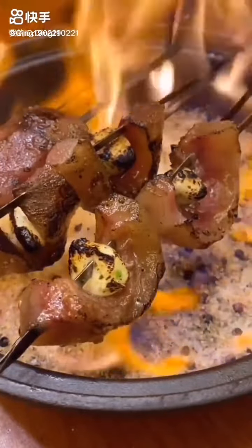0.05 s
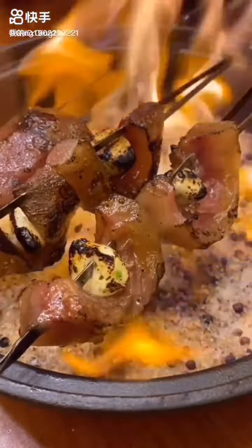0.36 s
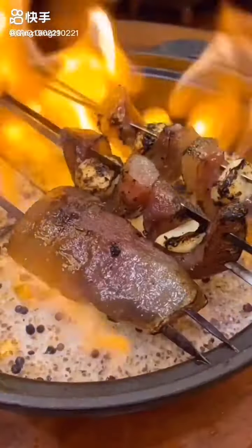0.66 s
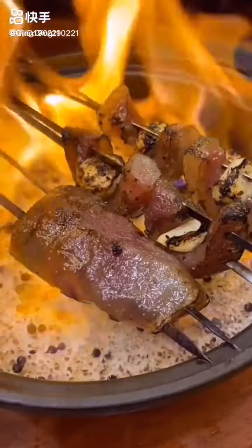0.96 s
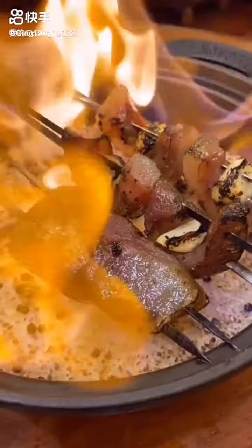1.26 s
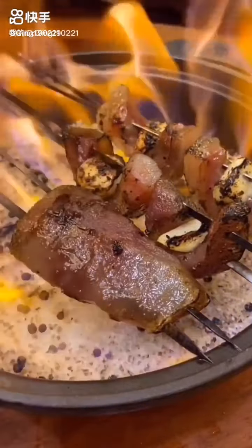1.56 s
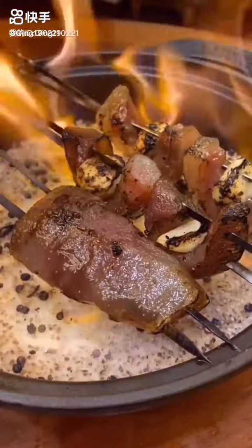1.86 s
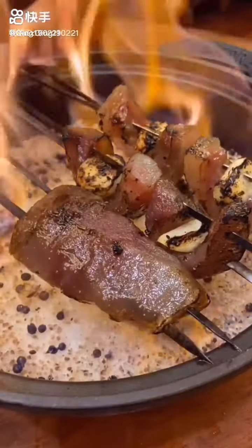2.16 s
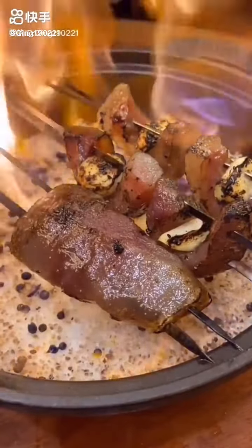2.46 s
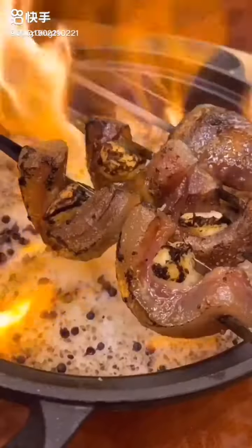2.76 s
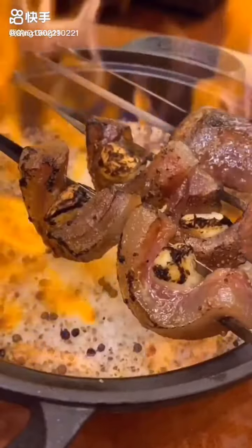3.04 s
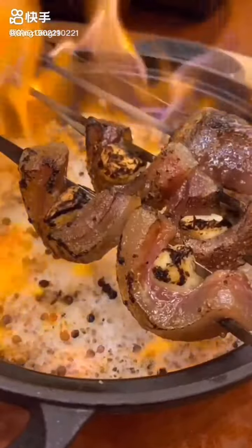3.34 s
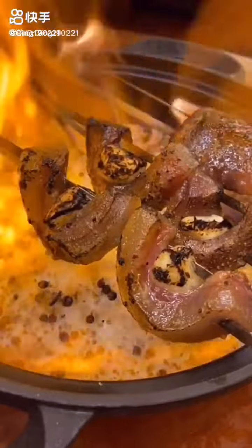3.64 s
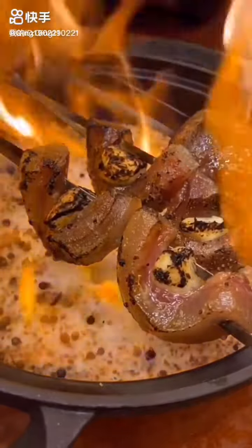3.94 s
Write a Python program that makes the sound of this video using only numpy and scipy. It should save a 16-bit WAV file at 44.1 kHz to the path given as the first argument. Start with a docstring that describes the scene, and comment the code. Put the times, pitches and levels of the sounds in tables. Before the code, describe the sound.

Skewered meat sizzles close up throughout, over softly rumbling, flapping flames in an iron pan and a faint low hum. Fat cracks sharply and fizzes away, loudest at 0.7 seconds, again around 1.7, 2 and 2.9, with smaller pops and steam spurts between. A gust of flame thumps the microphone at 3.5 seconds. The sound dips briefly near 0.4, 2.7 and 3.6 seconds.

```python
"""At an iron pan, close up: skewers of meat sizzle in open flames.
The flames rumble, flap and flare; fat fries in countless tiny bursts, drops crack and fizz away,
steam spurts from the meat. Hollows of the pan ring along. Near the end a gust of flame thumps the
microphone. The level dips briefly three times; a faint hum lies below."""
import sys
import numpy as np
from scipy import signal
from scipy.fft import rfft, irfft
from scipy.io import wavfile
from scipy.ndimage import uniform_filter1d

SR = 44100
rng = np.random.default_rng(int(sys.argv[2]) if len(sys.argv) > 2 else 0)


def int16_out(signal):
    """Quantize to a 16-bit WAV file."""
    q = np.round(np.clip(np.atleast_2d(signal).T, -1, 1) * 32767)
    wavfile.write(sys.argv[1], SR, q.astype(np.int16))


N = 176400
MIC_LAG_SAMPLES, TOP_HZ, CRACK_RISE_MS = 23, 15800, 0.33

# Strength of the fire. Each row: time in seconds, level in dB.
FLAME_LEVEL = [(0, -44.5), (.5, -44.5), (.8, -49.5), (1.1, -45), (1.4, -42.5), (1.6, -43.5), (2.1, -45),
               (2.5, -41), (2.85, -39), (3.1, -46.5), (3.35, -44.5), (3.8, -46), (4, -49.5)]


def undb(db):
    """Decibels to gain."""
    return 10 ** (np.asarray(db) / 20)


def unit(x):
    """Scale to rms 1."""
    return x / np.sqrt(np.mean(x ** 2) + 1e-18)


def curve(rows):
    """Gain along a (seconds, dB) curve."""
    return undb(np.interp(np.arange(N) / SR, *np.array(rows).T))


def colour(x, points, tilt_db_per_oct=0):
    """Shape by a tilted (Hz, dB) spectrum; rms 1."""
    octave = np.log2(np.maximum(np.fft.rfftfreq(x.shape[-1], 1 / SR), 1))
    hz, db = np.array(points).T
    rolloff_db = 20 * np.minimum(octave - np.log2(hz[0]), 0)
    gain = undb(np.interp(octave, np.log2(hz), db) + rolloff_db + tilt_db_per_oct * octave)
    return unit(irfft(rfft(x) * gain, x.shape[-1]))


def bell(hz, half_width_oct):
    """Spectrum of one peak, 9 dB down at the half width."""
    return [(hz * 2 ** (k * half_width_oct), -9 * k * k) for k in range(-3, 4)]


def highpass(x, hz):
    """Third-order high-pass."""
    return signal.sosfilt(signal.butter(3, hz, "high", fs=SR, output="sos"), x)


def walk(rate_hz):
    """Random steps, smoothed twice; rms 1."""
    hold = int(SR / rate_hz)
    steps = rng.standard_normal(4096)[np.arange(N) // hold % 4096]
    return unit(uniform_filter1d(uniform_filter1d(steps, hold), hold))


def noise():
    """Four independent white noises."""
    return rng.standard_normal((4, N))


def spread(x, aside_db, diffuse_db):
    """Four signals to stereo: one ahead, one from the left (late on the right), two diffuse."""
    aside = np.array([x[1], np.roll(x[1], MIC_LAG_SAMPLES)])
    return x[0] + undb(aside_db) * aside + undb(diffuse_db) * x[2:]


def panned(db, pan_db):
    """Stereo gains; pan is left over right."""
    return undb(db + np.array([[pan_db], [-pan_db]]) / 2)


def around(at_s, size=16384):
    """Window of samples opening a little before a moment."""
    start = min(max(int(at_s * SR) - size // 4, 0), N - size)
    return slice(start, start + size)


def frying(bursts_per_s=3500, spread_db=3, steam_db=-1.5):
    """Tiny bursting bubbles of very unequal size, over smooth steam."""
    bursts = (rng.random((4, N)) < bursts_per_s / SR) * np.sign(noise())
    sizes = undb(spread_db * np.minimum(rng.exponential(size=(4, N)), 7))
    return unit(bursts * sizes) + undb(steam_db) * noise()


def bubbles(t, spots_per_s=150, ticks_per_s=500, low_hz=1600, span_oct=2.2, half_s=.018, decay_ms=.9):
    """Spots of fat bubble: each ticks briefly at its own pitch, then dries out."""
    # Bubble spectrum. Each row: frequency in Hz, level in dB.
    spectrum = [(1200, -7), (2300, -2.5), (3000, -5.5), (4000, -2), (7000, 3.5), (11000, 4)]
    out = np.zeros((2, N))
    ticks = (rng.random(N) < ticks_per_s / SR) * rng.choice([-1, 1], N)
    ticks = ticks * undb(1.5 * np.minimum(rng.exponential(size=N), np.pi))
    for when, height, side, shift in rng.random((int(spots_per_s * N / SR), 4)):
        at_s = when * N / SR
        near = around(at_s - .03, size=6144)
        push = ticks.take(np.arange(near.start, near.stop) + int(shift * N), mode="wrap")
        push *= np.exp(-((t[near] - at_s) / half_s) ** 2)
        hz = low_hz * 2 ** (span_oct * height)
        pole = np.exp((2j * np.pi * hz - 1000 / decay_ms) / SR)
        ring = signal.lfilter([1], np.poly([pole, pole.conjugate()]).real, push) * pole.imag
        out[:, near] += [ring, np.roll(ring, int(side * MIC_LAG_SAMPLES))]
    return colour(out, spectrum)


def sizzle(t, bubble_db=-8, wander_db=1.6, flicker_db=1):
    """Meat fries throughout; level and colour wander."""
    # Frying strength. Each row: time in seconds, level in dB.
    level = [(0, -47), (.2, -43.5), (.38, -48), (.55, -43.5), (.82, -49), (1.1, -47.5), (1.42, -50.5),
             (1.55, -44.5), (1.6, -43), (1.68, -39.5), (1.82, -44), (1.92, -46), (2.08, -43), (2.17, -40),
             (2.46, -45.5), (2.8, -47), (3.3, -46.5), (4, -48)]
    # Frying spectrum. Each row: frequency in Hz, level in dB.
    spectrum = [(300, -23), (900, 6), (2100, 3.5), (3000, .5), (3900, 3.5), (4900, 1.5), (5700, 4.5),
                (7200, 3.5), (9200, .5), (11500, 1), (14000, .5), (16000, -3)]
    # Frying brightness. Each row: time in seconds, tilt in dB per octave.
    brightness = [(0, -0.8), (.8, -1.7), (1.4, -1.5), (1.7, 0.5), (2.4, -0.8), (2.9, 0.5), (3.3, 0), (4, 1)]
    # Centres of the independently wandering bands, in Hz.
    bands_hz = [300, 1200, 2500, 4500, 7000, 10500, 16000]
    hiss = colour(spread(frying(), aside_db=9.5, diffuse_db=3.5), spectrum)
    bins = rfft(unit(hiss + undb(bubble_db) * bubbles(t)))
    hz, out = np.fft.rfftfreq(N, 1 / SR), 0
    tilt_db_per_oct = np.interp(t, *np.array(brightness).T)
    for centre_hz, weights in zip(bands_hz, np.eye(len(bands_hz))):
        band = irfft(bins * np.interp(hz, bands_hz, weights), N)
        out += band * undb(wander_db * walk(24.86) + tilt_db_per_oct * np.log2(centre_hz / bands_hz[3]))
    return out * curve(level) * undb(flicker_db * walk(60))


def flames(rush_db=-9, rumble_flicker_db=2.5, rush_flicker_db=6):
    """Turbulent burning: a low rumble and a lighter, fluttering rush."""
    # Flame spectra. Each row: frequency in Hz, level in dB.
    rumble_spectrum = [(20, -46), (35, -4), (55, 4), (85, 3), (130, 0.5), (180, -6.5), (260, -17.5),
                       (400, -33), (900, -55)]
    rush_spectrum = [(80, 6.5), (170, -0.5), (250, 0.5), (350, -4.5), (500, -7), (700, -13), (1100, -12.5),
                     (2000, -18), (3200, -37), (8000, -43)]
    rumble = colour(spread(noise(), aside_db=-5.5, diffuse_db=-8.5), rumble_spectrum)
    rumble *= undb(rumble_flicker_db * walk(38))
    rush = colour(spread(noise(), aside_db=-1.5, diffuse_db=-1.5), rush_spectrum)
    rush *= undb(rush_db + rush_flicker_db * walk(45))
    return (rumble + rush) * curve(FLAME_LEVEL)


def eddies(t, per_s=160, low_hz=190.8, span_oct=3.41, half_cycles=2.54, base_db=-6, tilt_db_per_oct=-2):
    """Small pockets of gas catch, each a blip of a few cycles."""
    out = np.zeros((2, N))
    for when, height, size, phase, side in rng.random((int(per_s * N / SR), 5)):
        octave = span_oct * height
        hz = low_hz * 2 ** octave
        near = slice(max(int(when * N) - 1500, 0), int(when * N) + 1500)
        lag_s = np.array([[0], [side * MIC_LAG_SAMPLES / SR]])
        cycles = (t[near] - when * N / SR - lag_s) * hz
        size_db = 2.5 * (min(-np.log(1 - size), np.pi) - 1)
        swell = undb(base_db + tilt_db_per_oct * octave + size_db) * np.exp(-(cycles / half_cycles) ** 2)
        out[:, near] += swell * np.sin(2 * np.pi * (cycles + phase))
    return out * curve(FLAME_LEVEL)


def pan_hollows(x, wander_db=6.5, trim_db=-1.5):
    """Hollows between pan, rim and skewers ring, more or less as the hot air moves."""
    # Resonances. Each row: centre in Hz, width in Hz, nominal boost in dB.
    modes = [(330, 80, 1), (480, 94, 1.5), (729, 34, 5.5), (1535, 34, 3), (1910, 30, -1.5), (2610, 98, 7.5),
             (3470, 60, 9.5), (4260, 32, 9), (5330, 51, 7.5), (6255, 100, 5), (6660, 92, 6.5),
             (7160, 60, 1), (7700, 70, -3), (10350, 160, 12), (12462, 130, 10)]
    hz, bins, out = np.fft.rfftfreq(N, 1 / SR), rfft(x), x
    for centre_hz, width_hz, boost_db in modes:
        ring = irfft(bins / (1 + 2j * (hz - centre_hz) / width_hz), N)
        out = out + (undb(boost_db) - 1) * ring * undb(wander_db * (walk(6.87) - 1.5))
    return out * undb(trim_db)


def hum(hz=100, level_db=-53.5):
    """A faint low hum wavers in level and pitch."""
    gain = undb(level_db + 2 * walk(1.55))
    pitch_hz = hz * (1 + 0.01516 * walk(8.24))
    return gain * unit(np.sin(2 * np.pi * np.cumsum(pitch_hz) / SR))


def flaps(t, half_cycles=0.74):
    """A tongue of flame snaps over: a soft thud of a cycle or two."""
    # Flaps. Each row: time in seconds, level in dB, pitch in Hz, pan in dB.
    thuds = [(.081, -29.5, 185, -2), (0.1, -38, 111, 3), (.259, -38, 173, 0), (.338, -38.5, 190, 3),
             (0.481, -30.5, 90, -5), (0.94, -35, 90, 3.5), (1.142, -32, 100, 18), (1.328, -30, 128, 12),
             (1.467, -31.5, 99, 0), (1.52, -32.5, 219, 11), (1.548, -30, 148, 2), (1.622, -35.5, 129, 1),
             (1.639, -25, 93.5, 4.5), (1.891, -37, 74, 22), (2.16, -31.5, 260, -8), (2.473, -33, 88.5, 21),
             (2.644, -29.5, 79, 0), (3.313, -29, 121, 1), (3.36, -34, 152, 4), (3.476, -26, 250, 15),
             (3.5, -16, 105, 2)]
    out = np.zeros((2, N))
    for (at_s, db, hz, pan_db), (offset, skew) in zip(thuds, rng.random((len(thuds), 2))):
        cycles = (t - at_s) * hz
        near = np.abs(cycles) < 10
        phase = cycles[near] + offset + np.array([[0], [0.18 * skew]])
        swell = np.exp(-(cycles[near] / half_cycles) ** 2)
        out[:, near] += panned(db, pan_db) * swell * np.sin(2 * np.pi * phase)
    return out


def flares(t, throat_db=1.5, throat_oct=0.55, flicker_db=2.5):
    """Fat catches fire: a short ragged roar with a hollow pitch."""
    # Flare-ups. Each row: time in seconds, level in dB, half length in seconds, pitch in Hz.
    flare_ups = [(0.083, -42.5, 0.015, 317), (0.279, -45, 0.017, 326), (0.884, -41.5, 0.02, 490),
                 (1.489, -42.5, 0.041, 640), (1.53, -39, 0.029, 332), (1.634, -37.5, 0.026, 392),
                 (2.161, -42, 0.018, 353), (2.305, -50, 0.06, 700), (2.548, -40.5, 0.068, 1000),
                 (2.572, -42.5, 0.019, 415), (3.321, -37.5, 0.025, 242)]
    # Roar spectrum. Each row: frequency in Hz, level in dB.
    spectrum = [(60, -17), (150, 3.5), (320, 1), (500, -7), (750, -1.5), (1100, -6.5), (2200, -15.5),
                (3200, -30), (8000, -23), (16000, -51)]
    out = np.zeros((2, N))
    roar = colour(spread(noise(), aside_db=16.5, diffuse_db=4.5), spectrum)
    air = spread(noise(), aside_db=3.5, diffuse_db=-2.5)
    for at_s, db, half_s, hz in flare_ups:
        near = around(at_s - .09)
        throat = undb(throat_db) * colour(air[:, near], bell(hz, throat_oct))
        swell = undb(db) * np.exp(-((t[near] - at_s) / half_s) ** 2)
        out[:, near] += swell * (roar[:, near] + throat) / np.sqrt(2)
    return out * undb(flicker_db * walk(90))


def iron_echo(x, delay_ms=0.72, scatter=0.11, gain=0.39):
    """Add one quick reflection off the iron."""
    lag = int(SR * delay_ms / 1000 * (1 + scatter * rng.standard_normal()))
    return x + gain * np.roll(x, lag, axis=-1)


def pops(t, fizz_rise_s=0.0048):
    """A drop of fat bursts with a crack; its spray fizzes away on the hot iron."""
    # Drops. Each row: time in seconds, crack level in dB, crack decay in ms, fizz level in dB,
    # fizz decay in seconds, tilt in dB per octave, low cut in Hz, crack pan in dB.
    drops = [(.134, -38, 1.5, -50, .015, -7, 800, 0), (0.188, -41, 1.6, -52, .015, -9, 600, -5),
             (0.68, -5, 0.46, -28.5, 0.0046, .6, 1390, 0.5),
             (0.6832, -17.5, 1.3, -44.5, 0.078, -0.5, 1490, 2),
             (0.852, -25, 1.5, -38.5, 0.049, -4.5, 890, -2), (0.869, -22, 2.9, -38.5, 0.053, 5, 400, 1),
             (0.904, -34, 0.88, -47.5, 0.036, -3.5, 900, 5), (0.944, -35, 0.66, -51, 0.017, -3, 3000, 4),
             (1.087, -36.5, 1.4, -49.5, 0.018, -4, 805, -6), (1.451, -37, 1.6, -55, 0.017, -7, 1000, 3),
             (1.512, -34.5, 1.8, -55, .012, -10, 600, 4), (1.7083, -13.5, 2.1, -25, 0.012, 5.5, 1500, -1),
             (1.9500, -20, 0.56, -33.5, 0.046, -3.5, 1120, 3.5),
             (1.9913, -13, 0.43, -31, 0.027, 0, 5150, -2), (2.1073, -42, 0.45, -46, 0.019, -7, 1010, 0),
             (2.5216, -33, 0.6, -37.5, 0.024, -5.5, 795, 10), (2.5332, -30, .5, -40.5, 0.036, -8, 794, 5),
             (2.6497, -18.5, 0.72, -27, 0.033, 2.5, 3700, -3),
             (2.7463, -25, 0.89, -34.5, 0.012, -1, 1530, 3),
             (2.765, -38, 0.83, -43.5, 0.077, -3.5, 1510, -7),
             (2.8544, -9.5, 1.7, -31, 0.05, 1.2, 300, -0.5), (2.942, -35, .6, -41.5, 0.028, -7, 4000, 8.5),
             (2.9807, -33, 0.76, -46.5, 0.063, -4, 2030, 8), (3.023, -31, 0.6, -35, 0.026, 13, 4500, 12),
             (3.056, -33, .6, -58, 0.0092, 4, 4000, 3), (3.1699, -15.5, 0.23, -35.5, 0.022, 1, 3300, 1.5),
             (3.1973, -26, .8, -33.5, 0.018, 10.5, 4440, 0),
             (3.3717, -21.5, 0.82, -40, 0.072, -1.5, 3350, -3),
             (3.4837, -46, 0.45, -55, 0.0066, -6, 1520, -18),
             (3.4904, -26, 0.64, -31, 0.0058, -11, 2900, 16),
             (3.4929, -16, 1.3, -45, 0.006, -7.5, 2580, -2.5),
             (3.7734, -20.5, 0.24, -48, 0.049, 3, 2470, -3)]
    # Crack and fizz spectra. Each row: frequency in Hz, level in dB.
    crack_spectrum = [(150, -19), (500, -2), (1000, -5.5), (1800, 2.5), (3100, -6.5), (5500, -5.5),
                      (7500, -1), (11000, -2.5), (16000, -2.5)]
    fizz_spectrum = [(200, -44), (700, -13), (1700, -3.5), (3200, -5.5), (5500, -3), (8000, -2.5),
                     (10500, -2.5), (13500, -2.5), (16000, -1)]
    out = np.zeros((2, N))
    spray = spread(noise() + .4 * frying(), aside_db=0, diffuse_db=0.5) * undb(1.56 * walk(120))
    burst = spread(noise(), aside_db=-1, diffuse_db=-0.5)
    for at_s, crack_db, crack_ms, fizz_db, fizz_s, tilt, low_hz, pan_db in drops:
        near = around(at_s)
        before_s, after_s = np.maximum(at_s - t[near], 0), np.maximum(t[near] - at_s, 0)
        snap = np.exp(-1000 * (before_s / CRACK_RISE_MS + after_s / crack_ms))
        crack = colour(highpass(burst[:, near] * snap, low_hz), crack_spectrum, tilt)
        crack *= np.sqrt(np.mean(snap ** 2))
        fizz = colour(highpass(iron_echo(spray[:, near]), low_hz), fizz_spectrum, tilt)
        fizz *= np.exp(-before_s / fizz_rise_s - after_s / fizz_s)
        out[:, near] += panned(crack_db, pan_db) * crack + undb(fizz_db) * fizz
    return out


def juice_rings(t, glide=.06):
    """A bursting pocket of juice rings for a few cycles, rising in pitch as it opens."""
    # Pockets. Each row: time in seconds, level in dB, pitch in Hz, decay in ms, pan in dB.
    pockets = [(.680, -24, 1708, .9, -2), (.680, -9.5, 7900, 0.32, 0), (1.490, -34, 2240, 3.3, 5),
               (1.556, -33.5, 1500, 4.5, -2), (1.951, -17, 6040, 0.36, -1), (2.853, -12, 4660, 0.61, 6),
               (3.493, -19, 2620, 0.82, 11)]
    out = np.zeros((2, N))
    for (at_s, db, hz, decay_ms, pan_db), offset in zip(pockets, rng.random(len(pockets))):
        near = around(at_s)
        age_ms = 1000 * (t[near] - at_s)
        fade = np.exp(np.minimum(age_ms / CRACK_RISE_MS, -age_ms / decay_ms))
        pitch_hz = hz * (1 + glide * np.tanh(age_ms / decay_ms))
        phase = np.cumsum(pitch_hz) / SR + offset + np.array([[0], [.2]])
        out[:, near] += panned(db, pan_db) * fade * np.sin(2 * np.pi * phase)
    return out


def spurts(t, flicker_db=2.0):
    """Steam forces its way out of the meat in short narrow hisses."""
    # Steam jets. Each row: time in seconds, level in dB, half length in seconds, centre in Hz,
    # half width in octaves.
    jets = [(1.496, -42.5, 0.045, 1810, 0.65), (1.535, -42, 0.063, 7550, 0.28),
            (1.77, -49, 0.19, 7800, 0.49), (2.294, -45, 0.072, 4060, 0.46),
            (2.296, -43.5, 0.053, 1440, 0.54), (2.943, -43.5, 0.017, 9200, 0.11),
            (3.033, -36.5, 0.0084, 5320, 0.093), (3.491, -21.5, 0.0032, 4890, 0.093)]
    steam, out = spread(frying(), aside_db=9.5, diffuse_db=9), np.zeros((2, N))
    for at_s, db, half_s, hz, half_width_oct in jets:
        near = around(at_s - .09)
        swell = undb(db) * np.exp(-((t[near] - at_s) / half_s) ** 2)
        out[:, near] += swell * colour(steam[:, near], bell(hz, half_width_oct))
    return out * undb(flicker_db * walk(150))


def gust(t, at_s=3.494, half_s=0.0054, level_db=-13, pan_db=5):
    """A puff of hot air buffets the microphone, mostly on the left."""
    # Thump spectrum. Each row: frequency in Hz, level in dB.
    spectrum = [(25, -3), (60, 3), (130, 1), (300, -2), (450, -5.5), (700, -15), (1100, -27), (3000, -31.5)]
    push = np.exp(-np.abs(t - at_s) / half_s)
    air = colour(spread(noise(), aside_db=1, diffuse_db=-5.0), spectrum)
    thump = unit(air * push) * np.sqrt(np.mean(push ** 2))
    return thump * panned(level_db, pan_db)


def scene():
    """Fire, sizzle and steam ring in the pan; bursts and hum add directly."""
    t = np.arange(N) / SR
    fire = flames() + eddies(t) + flares(t) + flaps(t) + gust(t)
    return pan_hollows(sizzle(t) + spurts(t) + fire) + pops(t) + juice_rings(t) + hum()


def record(dry):
    """Microphone pair: width varies with pitch; three brief level dips, clipping, top cut."""
    # Stereo width. Each row: frequency in Hz, side gain in dB.
    width = [(30, 0), (120, 3.5), (300, 5), (700, 2), (1300, -19.5), (2100, -3.5), (3000, 0.5), (4900, 2.5),
             (5800, -24), (7000, 0.5), (10800, 0.5), (11900, -14), (13200, 0), (16000, -2)]
    # Level dips. Each row: time in seconds, depth in dB, half length in seconds, squareness.
    dips = [(0.419, -23.5, 0.028, 2.2), (2.687, -31.5, 0.024, 2.2), (3.614, -15.5, 0.094, 3.9)]
    t = np.arange(N) / SR
    hz, side_db = np.array(width).T
    side_gain = undb(np.interp(np.log(np.fft.rfftfreq(N, 1 / SR) + 1), np.log(hz), side_db))
    side = irfft(rfft(dry[0] - dry[1]) / 2 * side_gain, N)
    pair = dry.mean(axis=0) + np.array([side, -side])
    dip_db = sum(db * np.exp(-np.abs((t - at_s) / half_s) ** power) for at_s, db, half_s, power in dips)
    lowpass = signal.ellip(10, .2, 80, TOP_HZ, fs=SR, output="sos")
    return signal.sosfilt(lowpass, np.clip(pair * undb(dip_db), -1, 1))


dry = scene()
out = record(dry)
int16_out(out)
```